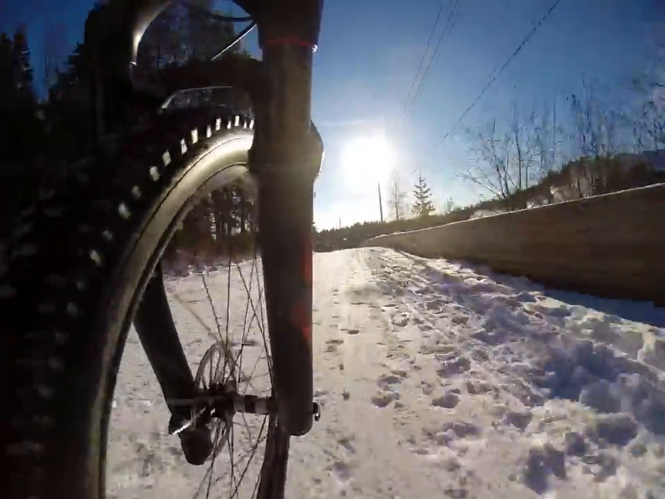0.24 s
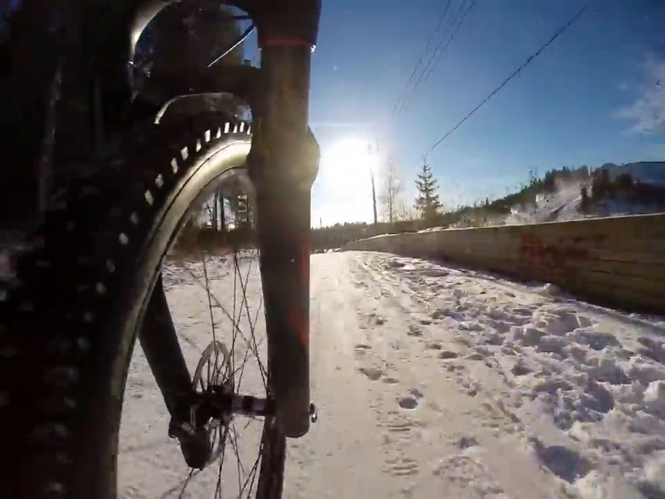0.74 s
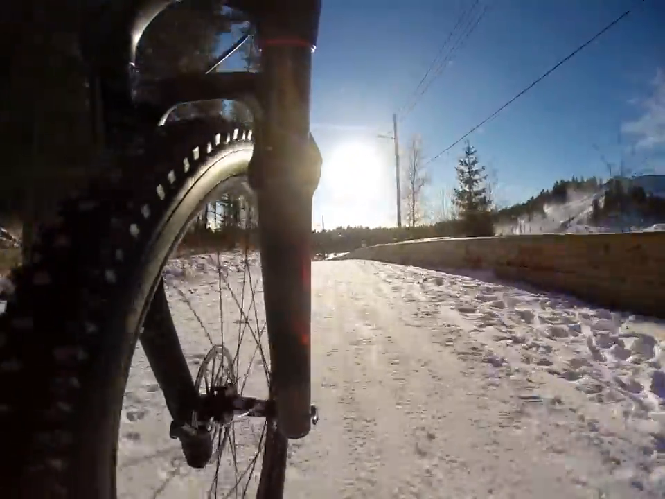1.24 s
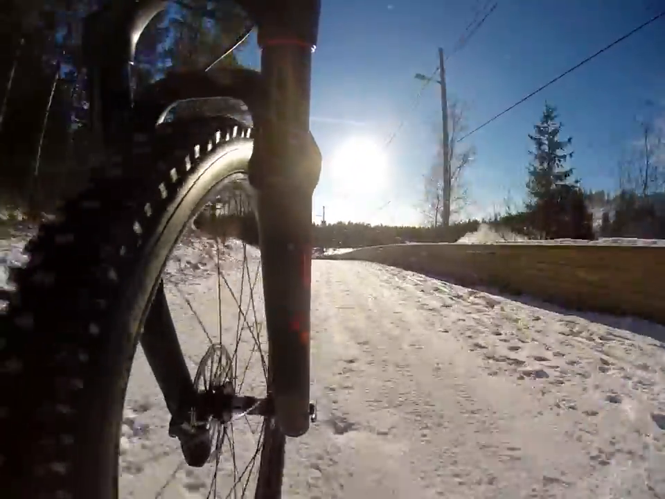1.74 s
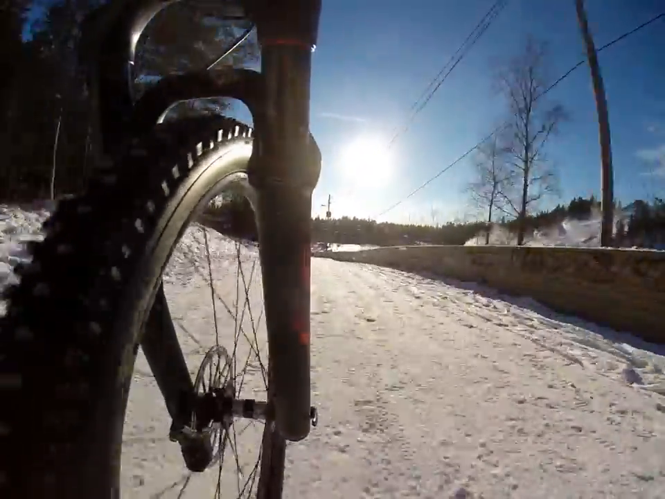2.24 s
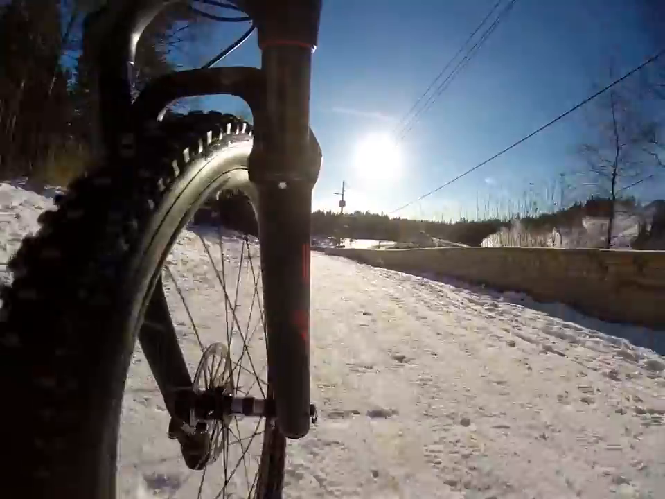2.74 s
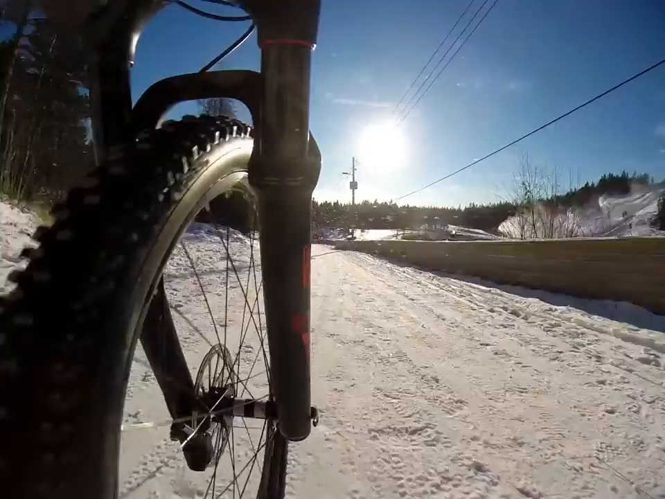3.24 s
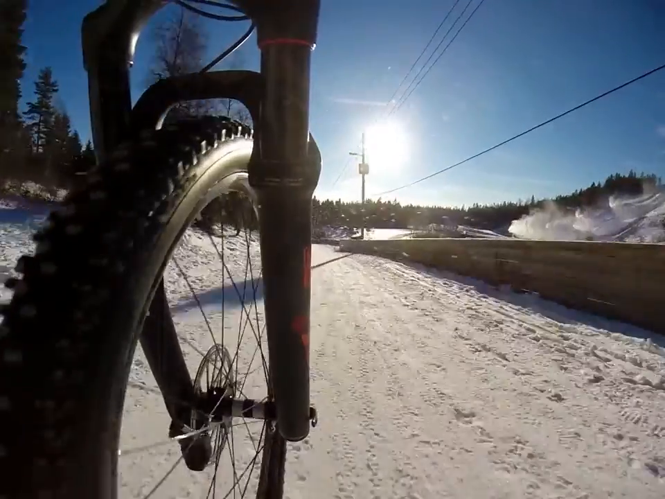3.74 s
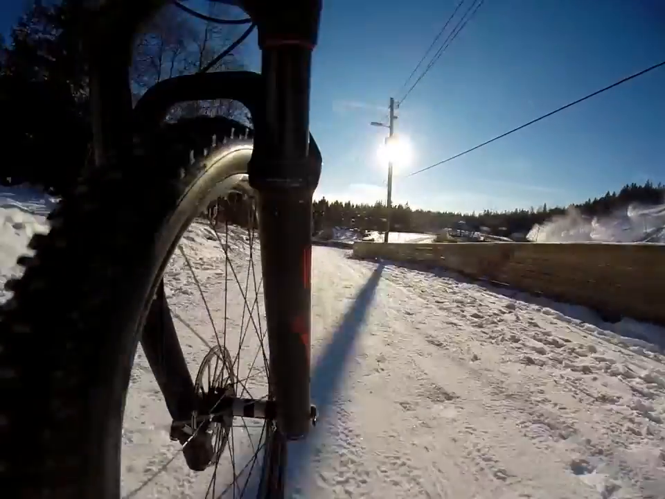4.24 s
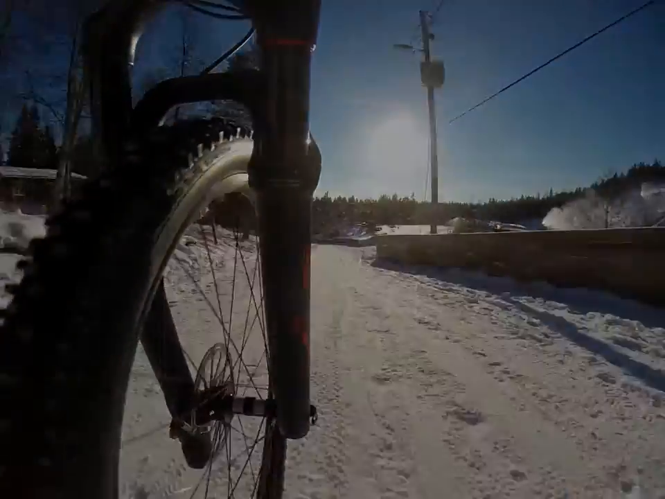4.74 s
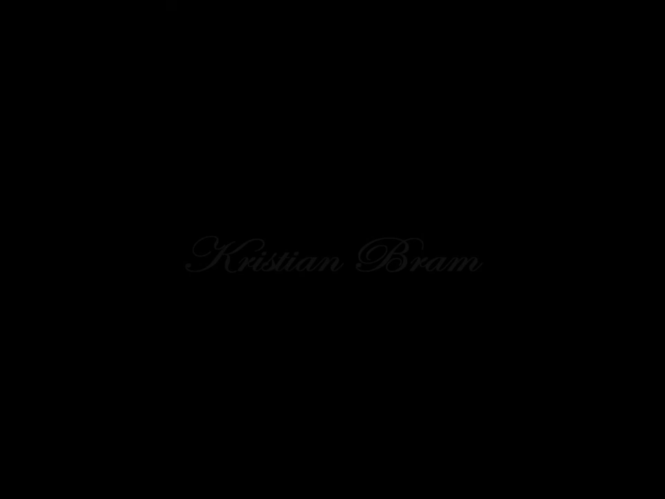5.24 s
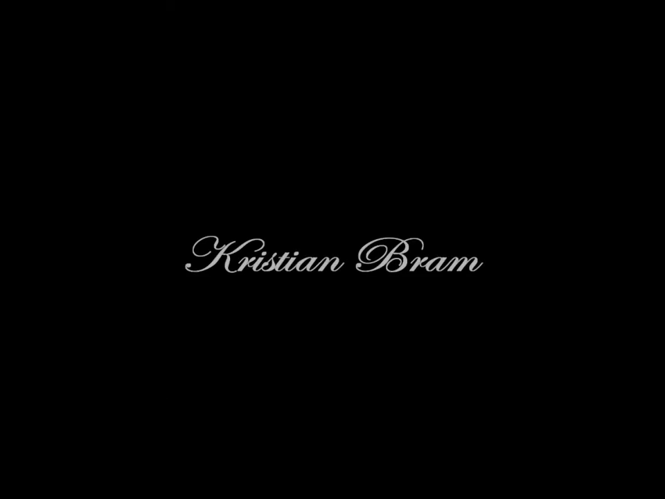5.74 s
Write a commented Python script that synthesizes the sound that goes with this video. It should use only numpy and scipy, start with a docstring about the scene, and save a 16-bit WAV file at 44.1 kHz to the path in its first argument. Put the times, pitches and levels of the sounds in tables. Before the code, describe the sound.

Continuous fast riding on snow, close and dry, slightly boxy as if through a camera case. Low, throbbing vibration from the bike dominates, with dense crackly crunch of studs biting crust and soft fizz of loose crystals. Small hard clicks of ice on bike and case start sparse, then become stronger and more frequent. The ride keeps going while the sound fades away over the last second or so.

```python
"""A bicycle with studded tyres rolls fast over packed snow, heard from a camera clamped close beside the front wheel.
From the start the low rumble of fork and frame swells and sinks, knobs hum on firm snow, studs crunch through crust.
Lumps break, plates snap and powder fizzes; flung ice grains tick on bike and case, louder from about 1.8 s.
From 4.62 s everything fades to silence. Modes are drifting tones and shaped noise; snow and ice are
random taps, short fractures and ringing grains, most of them coloured by the camera case."""
import sys
import numpy as np
from scipy import signal
from scipy.fft import rfft, irfft
from scipy.io import wavfile
from scipy.ndimage import uniform_filter1d

SR = 44100
rng = np.random.default_rng(int(sys.argv[2]) if len(sys.argv) > 2 else 0)


def wav_out(sig):
    """Save sig, one row per channel (or a flat mono array), as 16-bit PCM at SR to the path in sys.argv[1]."""
    wavfile.write(sys.argv[1], SR, np.round(np.clip(np.atleast_2d(sig).T, -1, 1) * 32767).astype(np.int16))


N = 263718
TIME = np.arange(N) / SR  # s
NOISE_HZ = np.fft.rfftfreq(N, 1 / SR)
EDGE_HZ = 15000  # upper limit of the camera's sound

# swells of the low rumble: centre t/s, width at half power/s, fork level/dB and frame level/dB before trim
SWELLS = [(0.004, 0.04, -14.5, -30), (0.09, 0.028, -36, -15), (0.184, 0.086, -18, -38),
          (0.263, 0.078, -10, -26), (0.53, 0.1, -18.5, -20.5), (0.617, 0.062, -15, -34),
          (0.735, 0.1, -34.5, -15), (0.965, 0.063, -15, -15.5), (1.135, 0.098, -17, -19),
          (1.323, 0.065, -17, -20.5), (1.44, 0.04, -14, -15), (1.499, 0.024, -27, -10.5),
          (1.589, 0.057, -17, -16.5), (1.843, 0.061, -13, -27), (1.932, 0.03, -14, -19.5),
          (2.046, 0.022, -13.5, -19), (2.166, 0.11, -14, -25), (2.358, 0.057, -15.5, -19),
          (2.479, 0.031, -14, -21), (2.57, 0.18, -15.5, -19), (2.748, 0.035, -15.5, -13.5),
          (2.913, 0.082, -20, -15), (3.02, 0.043, -23, -12.5), (3.078, 0.045, -13.5, -30),
          (3.184, 0.12, -16.5, -36), (3.46, 0.094, -17.5, -17), (3.645, 0.039, -23, -12),
          (3.701, 0.028, -13.5, -30), (3.863, 0.061, -19, -20), (3.94, 0.037, -15, -28),
          (4.068, 0.03, -37, -12.5), (4.134, 0.063, -18, -15), (4.262, 0.03, -13.5, -28),
          (4.42, 0.11, -22, -20), (4.584, .06, -21.5, -23), (4.79, 0.2, -21, -32), (5.05, 0.22, -30, -21.5),
          (5.378, 0.072, -26, -32), (5.516, 0.039, -18.5, -32)]
# steady drone of the frame under the swells: t/s, level/dB before trim
FRAME_DRONE = [(0, -16.5), (0.4, -21.5), (0.9, -23), (2.2, -21), (3.03, -21), (3.16, -26.5), (3.4, -20),
               (4.6, -18), (4.8, -25), (5.05, -23), (5.9, -23)]


def swells(fork_idle_db=-22, fork_throb_db=4.5, frame_throb_db=3, throb_hz=9.4):
    """Gains of fork and frame: the rumble swells and sinks over a throbbing idle level, powers adding."""
    power = 0
    for s, width_s, *levels_db in SWELLS:
        swell = np.exp(-np.log(16) * ((TIME - s) / width_s) ** 2)
        power = power + np.outer(gain_of(levels_db) ** 2, swell)
    fork_swell, frame_swell = np.sqrt(power)
    fork_idle = gain_of(fork_idle_db + fork_throb_db * np.tanh(wander(throb_hz)))
    frame_idle = follow(FRAME_DRONE) * gain_of(frame_throb_db * np.tanh(wander(throb_hz)))
    return np.hypot(fork_swell, fork_idle), np.hypot(frame_swell, frame_idle)


# loose resonances of fork and frame: f/Hz, half-width at -6 dB/Hz, relative level/dB
FORK = [(28.1, 10, -7.5), (39.8, 20, -7), (52.3, 14, -7)]
FRAME = [(99.4, 37, -10), (127.3, 16.3, -7.5), (154, 25, -21)]
# spectrum of the ground rumble: f/Hz, relative level/dB
RUMBLE_COLOUR = [(13, -18), (23, -7.5), (50, 5.5), (72, -3), (100, 7.5), (150, -7), (180, -5), (220, -1),
                 (255, -15), (350, -6), (550, -11), (1000, -64)]


def bike(shake, drone, fork_hz=50.42, frame_hz=113.83, fork_loose_db=-3.0, fork_top_hz=63):
    """The fork swings low, the frame drones just over an octave above, and the ground rumbles through both."""
    fork_tone = sway(fork_hz, drift_hz=2.66, rate_hz=4.1)
    fork_noise = gain_of(fork_loose_db) * shaken(FORK, steadiness=0.73, memory_s=0.018)
    fork = shake * evened(fork_tone + fork_noise)
    fork = signal.sosfiltfilt(signal.butter(6, fork_top_hz, fs=SR, output="sos"), fork, padtype=None)
    frame_tone = sway(frame_hz, drift_hz=2.77, rate_hz=5.15)
    frame = drone * evened(frame_tone + shaken(FRAME, steadiness=0.56, memory_s=0.056))
    ground = (shake * drone) ** 0.25 * evened(shaped_noise(gain_of(read(RUMBLE_COLOUR, NOISE_HZ))))
    return gain_of(0.96) * fork + gain_of(-2.0) * frame + gain_of(-21.0) * ground


# firm snow under the knobs: start t/s, length/s, knob hum level/dB before trim, casing ring level/dB
GRIPS = [(0.544, 0.053, -34, -33), (0.688, 0.11, -47, -32.5), (0.838, 0.14, -27.5, -33.5),
         (1.154, 0.16, -32.5, -35.5), (1.261, 0.053, -32, -28), (1.383, 0.065, -44, -29),
         (1.647, 0.19, -30.5, -36.5), (2.425, .16, -35, -31), (2.715, 0.25, -50, -36),
         (2.976, 0.087, -25, -29), (3.378, 0.3, -32, -29.5), (3.797, 0.16, -33, -32),
         (3.99, 0.14, -26.5, -35), (4.221, 0.045, -25, -45), (4.6, 0.28, -27.5, -37),
         (4.675, 0.071, -24.5, -42), (4.958, 0.18, -38, -35.5)]


def grips(crust_db, idle_db=-38.5, edge_s=0.013, hum_per_crust=0.4):
    """Gains of knob hum and casing ring: firm stretches stand out from an idle level that rises on crust."""
    grip = sum(np.outer(gain_of(dbs), stretch(s, length_s, edge_s)) for s, length_s, *dbs in GRIPS)
    return np.hypot(grip, gain_of(idle_db + hum_per_crust * crust_db))


# resonances of the tyre casing: f/Hz, half-width at -6 dB/Hz, relative level/dB
TREAD = [(398, 40, -1), (426.5, 38, 3.5), (466, 5.6, 5.5), (464.6, 21, 3)]


def tread(hum, ring, knob_hz=398.5, sway_hz=11.0, waver_db=0.5):
    """Rows of knobs slap the snow at a nearly steady rate; rough snow sets the tyre casing ringing."""
    slaps = np.cumsum(knob_hz + sway_hz * wander(rate_hz=35.0)) / SR
    tone = evened(np.sin(2 * np.pi * slaps))
    level = hum * gain_of(-4.0 + waver_db * wander(rate_hz=6.8))
    return level * tone + ring * shaken(TREAD, steadiness=0.27, memory_s=0.18)


# patches of hard crust: start t/s, length/s, change of crunch level/dB, change of powder fizz level/dB
CRUST = [(0.0, 0.17, 2, 2.5), (0.177, 0.1, 4.5, 4.5), (0.395, 0.05, 1, 2), (0.47, 0.32, 3.5, 3.5),
         (0.884, 0.09, 3.5, 4), (1.225, 0.12, 5.5, 6.5), (1.362, 0.13, 4.5, 4.5), (1.669, 0.15, 8, 4.5),
         (2.024, 0.16, 3.5, 3), (2.252, 0.1, 6, -6), (2.382, 0.21, 6, 7), (2.647, 0.14, 3, 4),
         (2.813, 0.11, 2.5, 3), (2.974, 0.1, 6, 2), (3.298, 0.044, 8, 6), (3.39, 0.31, 6, 4.5),
         (3.783, 0.18, 3.5, 3.5), (3.99, 0.14, 7, 6), (4.153, 0.12, 6, 3), (4.324, 0.1, 4, 4),
         (4.548, 0.26, 4, 4), (4.95, 0.48, 3, 4), (5.607, 0.44, 2, 5.5)]


def crust(soft_snow_db=-36.5, edge_s=0.024, uneven_db=1.3):
    """Crunch gain, with the crust and fizz changes in dB, as the tyre runs through patches of hard crust."""
    crust_db, fizz_db = sum(np.outer(dbs, stretch(s, length_s, edge_s)) for s, length_s, *dbs in CRUST)
    crunch = gain_of(soft_snow_db + crust_db + uneven_db * wander(rate_hz=13))
    return crunch, crust_db, fizz_db


# spectrum of the stud bites: f/Hz, relative level/dB
CRUNCH_COLOUR = [(100, -2), (300, 7.5), (550, -5), (800, -2), (950, -2), (1700, -0.5), (2300, -12.5),
                 (2700, -13.5), (3600, -19.5), (4400, -38), (6200, -35.5), (8000, -51.5), (15000, -77.5)]


def studs(crunch, clumps):
    """Studs bite the crust in quick clumps, each bite a short tap through the case, stronger inside a clump."""
    bites = patter(per_s=2200, spread_db=0.0) * gain_of(1.28 * clumps)
    sound = signal.oaconvolve(bites, case_ring(CRUNCH_COLOUR))[:N]
    sound /= band(sound, 550, 1600).std()  # the level counts in this band
    return gain_of(-4.0) * crunch * sound


def crackle(crunch, plates_db=-7.0, chips_db=-22.5):
    """Small plates of crust snap one by one, and finer chips break off their edges."""
    plates = snaps(lo_hz=770, hi_hz=2448, per_s=330, cycles=4.3, spread_db=2.5)
    chips = snaps(lo_hz=2080, hi_hz=6770, per_s=170, cycles=2.6, spread_db=3.0)
    plates = gain_of(plates_db) * evened(band(plates, 460, 1700))
    chips = gain_of(chips_db) * evened(band(chips, 1500, 3270))
    return crunch * (plates + chips)


# lumps of crust that break under the tyre: t/s, length/s, level/dB before trim, pitch f/Hz
LUMPS = [(0.015, 0.0039, -24.5, 990), (0.138, 0.0065, -25.5, 1150), (0.199, 0.011, -29, 1390),
         (0.394, 0.0032, -25.5, 1610), (0.41, 0.0031, -27, 895), (0.433, 0.0068, -25, 1290),
         (0.495, 0.0025, -32, 1750), (0.537, 0.014, -27.5, 1060), (0.596, 0.011, -28, 1810),
         (0.614, 0.008, -28, 1530), (0.639, 0.0077, -27, 1760), (0.673, 0.0051, -24, 1340),
         (0.726, 0.0042, -22.5, 1490), (0.758, 0.012, -30, 1210), (0.903, 0.013, -30, 880),
         (0.923, 0.004, -29.5, 1800), (1.051, 0.0093, -27.5, 1030), (1.106, 0.018, -32, 1420),
         (1.392, 0.0053, -20.5, 1500), (1.406, 0.019, -27.5, 1050), (1.43, 0.0087, -21.5, 1780),
         (1.482, 0.0088, -26.5, 1580), (1.566, 0.0039, -29.5, 1210), (1.578, 0.011, -30, 1530),
         (1.655, 0.0032, -19, 1200), (1.714, 0.0034, -28, 1560), (2.025, 0.0031, -23.5, 1780),
         (2.138, 0.013, -27.5, 910), (2.158, 0.008, -31, 1500), (2.252, 0.0058, -35, 1950),
         (2.428, 0.013, -24, 940), (2.445, 0.0079, -20, 1630), (2.537, 0.0078, -21, 1250),
         (2.563, 0.0044, -28, 1330), (2.584, 0.0026, -25.5, 2050), (2.648, 0.005, -29, 1300),
         (2.663, 0.0027, -24.5, 1660), (2.74, 0.0066, -23, 850), (2.76, 0.005, -23, 1570),
         (2.822, 0.011, -31, 1840), (2.952, 0.011, -29.5, 1300), (3.018, 0.0084, -21, 1100),
         (3.177, 0.0066, -31.5, 1570), (3.327, 0.003, -25.5, 1310), (3.431, 0.009, -28.5, 1260),
         (3.493, 0.0047, -23.5, 900), (3.606, 0.016, -28.5, 1370), (3.629, 0.005, -28, 1850),
         (3.803, 0.013, -27.5, 1130), (3.87, 0.0067, -27, 1210), (4.016, 0.009, -32, 1960),
         (4.058, 0.008, -29, 1700), (4.399, 0.009, -31, 1790), (4.597, 0.0074, -42, 1970),
         (4.853, 0.0065, -22.5, 970), (5.241, 0.0062, -25.5, 1640)]
# spectrum of a breaking lump: f/Hz, relative level/dB
LUMP_COLOUR = [(300, 5), (550, -3), (900, -2), (2000, 0), (2700, -12), (3600, -12.5), (4400, -39.5),
               (6200, -37), (15000, -72.5)]


def lumps(level_db=-1.5, focus_db=11, focus_hz=400, crumble_s=0.0012, delay_s=0.000796):
    """Each lump gives way in a short run of fractures that ring about its own pitch."""
    out, t = np.zeros(N), TIME[:1024]
    ring = case_ring(LUMP_COLOUR)
    hz = np.fft.rfftfreq(len(ring), 1 / SR)
    delayed = rfft(ring) * np.exp(-2j * np.pi * hz * delay_s)
    chances = rng.standard_normal((len(LUMPS), len(t)))
    for (s, length_s, db, pitch_hz), chance in zip(LUMPS, chances):
        focus = gain_of(focus_db / (1 + ((hz - pitch_hz) / focus_hz) ** 2))
        run = np.exp(-np.maximum(t - 0.62 * length_s, 0) / crumble_s)
        burst = signal.fftconvolve(chance * abs(chance) * run, irfft(delayed * focus))
        # the level is the mean over the lump's length, in its main band
        burst *= np.sqrt(abs(length_s) * SR) / np.linalg.norm(band(burst, 690, 2400))
        add(out, s, gain_of(db + level_db) * burst)
    return out


# ice grains that strike the bike: t/s, level over 3 ms/dB, weight of the dull part/dB before dull_db, hardness/dB
TICKS = [(0.2562, -31, 17, 0), (0.3637, -28.5, -2, 3.5), (0.5, -29.5, -10, 0), (0.6716, -31, 2, -5),
         (0.783, -27, 2, -2), (0.8623, -29.5, 4, -4), (0.9659, -28.5, 13, -5), (1.0305, -26, 1, 3),
         (1.041, -27, 6, -12), (1.059, -37, -6, -2), (1.072, -30.5, 4, 4), (1.3562, -35, -10, 9),
         (1.5556, -31, -3, -4), (1.57, -31.5, 1, 3), (1.6841, -24, -3, -15), (1.778, -31, -2, 12),
         (1.7945, -18, 5, 1), (1.826, -28.0, -7, -7), (2.1145, -22.5, 5, -1), (2.3133, -24.5, 3, -4),
         (2.338, -31, 2, 6), (2.4048, -32, -8, 15), (2.4663, -19.5, 13, -6), (2.4839, -26.5, 7, 2),
         (2.532, -22, 2, 2), (2.701, -32, -8, 0), (2.714, -32, -8, 6), (2.7335, -32, -4, 9),
         (2.8628, -14, 10, 2), (2.977, -18, -10, -7.5), (2.994, -20, -16, -3), (3.0484, -15.5, 12, 1),
         (3.1497, -21.5, 5, -3), (3.3027, -19.5, -15, -0.5), (3.3829, -20, 9, 1), (3.5022, -19.5, -1, 1),
         (3.5487, -35, 0, -1), (3.578, -18.0, 1, -2), (3.6361, -22.5, 15, 3), (3.659, -20.5, -8, -2),
         (3.761, -27, -9, -3), (3.83, -24, 5, -5), (3.925, -21.5, 16, 3), (3.951, -38, -3, 12),
         (4.1364, -18.5, 8.5, 1.5), (4.1673, -38, -7, 12), (4.2192, -25.5, 5, -2), (4.25, -22, -4, -5),
         (4.316, -25, 6, 0), (4.343, -23, -14, 0), (4.38, -29, 0, -14), (4.4088, -32.5, -5, -6),
         (4.439, -23, -3, -2.5), (4.5025, -21.0, 11, 4), (4.6008, -29, -7, -7), (4.7041, -23, 15, -4),
         (4.7535, -17, 3.5, -1.5), (4.776, -31, -2, -10), (4.8202, -32, -10, 0), (4.8491, -27.5, -2, -7),
         (4.8765, -26, 13, 3), (4.9, -24, 7, -1), (5.013, -32, 8, -11), (5.086, -27.5, -7, -5),
         (5.156, -21.5, 14, 5), (5.232, -27, -2, -5), (5.2835, -22.5, 7, 0.5), (5.379, -23, 15, -1.5),
         (5.5154, -21.5, 13, 2), (5.634, -31.5, -8, -12), (5.715, -27.5, -4, -10), (5.776, -36, -1, -2),
         (5.884, -31, -3, -1)]
# spectrum of a middling grain's tap: f/Hz, relative level/dB
TICK_COLOUR = [(100, -39), (500, -26), (800, -42.5), (1100, -11.5), (1500, -13.5), (1800, 1.5), (2300, 0.5),
               (2550, -5), (3600, -8.5), (4400, -25.5), (6500, -22.5), (8000, -35.5), (11000, -44),
               (15000, -53.5)]


def ticks(grains, rebound_s=0.00083, rebound=0.3, dull_db=3, spot_db=2.0, size_spread=0.074,
          ringing=0.99, ring_spread=0.35, shatter_db=-6, shatter_s=0.0022, splinter_hz=3500,
          crumbs_db=-12, crumbs_s=0.004, delay_s=0.000997):
    """A hard grain taps the bike, rebounds in about a millisecond and shatters; size and spot set its colour."""
    out, t = np.zeros(N), TIME[:1024]
    spots_hz = np.geomspace(600, 14000, num=20)
    hz = np.fft.rfftfreq(2 * len(t), 1 / SR)
    chances = rng.standard_normal((len(grains), 3 + len(spots_hz)))
    shards = rng.standard_normal((len(grains), len(t))) * np.exp(-t / shatter_s)
    crumbs = rng.standard_normal((len(grains), len(t))) ** 3 * np.exp(-t / crumbs_s)
    for (s, db, weight_db, hard_db), chance, bits, scatter in zip(grains, chances, shards, crumbs):
        late, size, near, *spot = chance
        stretched = 1 + size_spread * np.tanh(size)
        colour = [(f * stretched, level) for f, level in TICK_COLOUR]
        ring = case_ring(colour, ringing + ring_spread * np.tanh(near))
        # heavy grains carry more below the ring of the case, hard ones more above it
        dull = (weight_db + dull_db) / (1 + (hz / 1650) ** 8)
        hard = hard_db * hz ** 8 / (hz ** 8 + 2550. ** 8)
        gain = gain_of(dull + hard + spot_db * np.interp(hz, spots_hz, spot))
        tap = irfft(rfft(ring) * gain * np.exp(-2j * np.pi * hz * delay_s))
        # shards and first blow, then crumbs, then the rebound a little earlier or later
        blows = gain_of(shatter_db) * band(bits / np.linalg.norm(bits), splinter_hz, EDGE_HZ)
        add(blows, 0, [1])
        add(blows, rebound_s, gain_of(crumbs_db) * scatter / np.linalg.norm(scatter))
        add(blows, rebound_s * (1 + 0.51 * np.tanh(late)), [rebound])
        tick = signal.fftconvolve(blows, tap)
        tick *= np.sqrt(0.003 * SR) / np.linalg.norm(band(tick, 1500, 9000))
        add(out, s, gain_of(db) * tick)
    return out


def stray_grains(level_db=-38, count=14):
    """Smaller ice grains hit at random all along the way; rows as in TICKS."""
    spreads_db = rng.standard_normal((count, 3)) * [2, 4, 3]  # level, weight, hardness
    times = (np.arange(count) + rng.random(count)) * TIME[-1] / count
    return [(s, level_db + force_db, *colour_db) for s, (force_db, *colour_db) in zip(times, spreads_db)]


# spectrum of loose snow: f/Hz, relative level/dB
POWDER_COLOUR = [(300, 0), (900, 11), (2200, -5), (2700, 0), (3600, -2), (4400, -18.5), (6200, -14.5),
                 (7800, -28.5), (10300, -29), (11500, -42.5), (15000, -55.5)]


def powder(fizz_db, clumps, level_db=-50.0):
    """Fine snow crystals fizz under the tread, mostly more where they lie loose on crust."""
    grains = snaps(lo_hz=1830, hi_hz=14700, per_s=3500, cycles=1.68, spread_db=-2)
    grains = grains * gain_of(2.5 * clumps + 3.4 * wander(rate_hz=25))
    sound = signal.oaconvolve(grains, case_ring(POWDER_COLOUR, ringing=0.75))[:N]
    return gain_of(level_db + fizz_db) * evened(sound)


# spectrum of flung crystals on the case: f/Hz, relative level/dB
SPRAY_COLOUR = [(500, -22), (2200, -2.5), (3600, 3.5), (4500, -4.5), (6500, -8), (8000, -14), (10300, -20),
                (12000, -21.5), (14000, -34.5), (15500, -52.5)]


def spray(crunch, clumps):
    """Stray crystals flung off the tread prick the case, sparse and bright."""
    pricks = patter(per_s=90, spread_db=-0.5) * gain_of(5.4 * np.tanh(clumps))
    return gain_of(-33) * crunch * evened(signal.oaconvolve(pricks, case_ring(SPRAY_COLOUR))[:N])


# splinters of ice that prick the case: t/s, level over 2 ms/dB before trim
SPLINTERS = [(0.223, -42), (0.9147, -50), (0.9366, -44), (0.96, -44), (1.295, -48.5), (1.7848, -49),
             (1.818, -46), (2.301, -48), (2.352, -39), (2.715, -51), (2.946, -41), (3.027, -39),
             (3.484, -50), (3.5912, -37), (3.651, -47), (4.0273, -44), (4.6837, -41)]


def splinters(level_db=-0.5, bright_db=3):
    """Now and then a larger splinter flies off the tread and makes one thin, bright prick."""
    out = np.zeros(N)
    colour = [(f, db + bright_db * np.tanh((f - 8000) / 3000)) for f, db in SPRAY_COLOUR]
    prick = case_ring(colour)
    prick *= np.sqrt(0.002 * SR) / np.linalg.norm(prick)
    for s, db in SPLINTERS:
        add(out, s, gain_of(db + level_db) * prick)
    return out


# resonances of the camera case: f/Hz, full width at half the lift/Hz, lift level/dB before ringing scales it
CASE = [(627.7, 46, 11.5), (734.4, 99, 10.5), (860, 110, 6), (934, 39, -14.5), (1210, 38, 7),
        (1338, 18, -4), (1437, 43, 6.5), (2261, 190, 8.5), (2900, 53, -3.5), (3914, 44, -18), (4040, 59, 3),
        (5470, 110, 9.5), (6800, 150, -3), (7160, 240, 5)]


def case_ring(colour, ringing=1, size=4096):
    """Causal (minimum-phase) response of the camera case to one tap, peak about 1; ringing scales its lifts."""
    hz = abs(np.fft.fftfreq(size, 1 / SR))
    lifts_db = sum(lift / (1 + (2 * (hz - f) / width) ** 2) for f, width, lift in CASE)
    log_gain = np.log(gain_of(read(colour, hz) + ringing * lifts_db))
    ring = np.fft.ifft(np.exp(np.conj(signal.hilbert(log_gain)))).real[:size // 2]
    return ring * np.hanning(size)[size // 2:] / abs(ring).max()


def sway(hz, drift_hz, rate_hz):
    """A lightly damped mode that keeps swinging: a tone whose pitch drifts."""
    return evened(np.sin(2 * np.pi * np.cumsum(hz + drift_hz * wander(rate_hz)) / SR))


def shaken(modes, steadiness, memory_s):
    """Modes driven by random shaking; steadiness 0-1 evens out the swing."""
    power = sum(gain_of(db) ** 2 / (1 + ((NOISE_HZ - f) / width) ** 2) ** 2 for f, width, db in modes)
    swing = shaped_noise(np.sqrt(power))
    energy = abs(uniform_filter1d(abs(signal.hilbert(swing)) ** 2, int(memory_s * SR) + 1))
    return evened(swing / (energy + 1e-20) ** (np.clip(steadiness, 0, 1) / 2))


def snaps(lo_hz, hi_hz, per_s, cycles, spread_db, count=36):
    """Grains that each ring for a few cycles at a pitch set by their size."""
    out, t = np.zeros(N), TIME[:1024]
    for hz in np.geomspace(lo_hz, hi_hz, count):
        age = t * hz / cycles
        snap = hz * age * np.exp(-2 * age) * np.sin(2 * np.pi * hz * t)
        out += signal.oaconvolve(patter(per_s / count, spread_db), snap)[:N]
    return evened(out)


def patter(per_s, spread_db):
    """A random train of taps of either sign; a positive spread makes a few large, a negative one a few small."""
    size = gain_of(spread_db * np.minimum(rng.exponential(1, N), 4))
    return size * rng.choice([-1, 1], N) * (rng.random(N) < per_s / SR)


def stretch(start_s, length_s, edge_s):
    """The tyre rolls onto a stretch of snow and off again: rise, hold, release, from 0 to 1."""
    return np.clip(.5 + np.minimum(TIME - start_s, start_s + length_s - TIME) / edge_s, 0, 1)


def wander(rate_hz):
    """Smooth random curve of rms 1, from 2 Hz to about the given rate."""
    return evened(shaped_noise(np.exp(-(NOISE_HZ / rate_hz) ** 2) * (NOISE_HZ > 2)))


def shaped_noise(amplitude):
    """White noise shaped by an amplitude for each frequency in NOISE_HZ."""
    return irfft(rfft(rng.standard_normal(N)) * amplitude, N)


def band(x, lo_hz, hi_hz):
    """Band-pass filter."""
    return signal.sosfilt(signal.butter(2, [lo_hz, min(hi_hz, SR / 2 - 1)], "band", fs=SR, output="sos"), x)


def gain_of(db):
    """Amplitude gain of a level in dB."""
    return 10 ** (np.asarray(db) / 20)


def evened(x):
    """Scale to rms 1."""
    return x / np.sqrt(np.mean(x ** 2) + 1e-20)


def read(points, hz):
    """Read a spectrum at given frequencies, along a log frequency axis."""
    f, value = np.transpose(points)
    return np.interp(np.log(hz + 1), np.log(f + 1), value)


def follow(curve):
    """A level curve as a gain for every sample."""
    return gain_of(np.interp(TIME, *np.transpose(curve)))


def add(mix, s, sound):
    """Add a sound into the mix from time s, cut off at the end."""
    part = mix[max(round(s * SR), 0):][:len(sound)]
    part += sound[:len(part)]


def scene():
    """The low rumble swells and sinks, crust raises the crunch, and firm snow brings out the hum."""
    shake, drone = swells()
    crunch, crust_db, fizz_db = crust()
    hum, ring = grips(crust_db)
    clumps = wander(rate_hz=120)  # uneven crust: studs, powder and spray swell together
    snow = studs(crunch, clumps) + crackle(crunch) + lumps()
    loose = powder(fizz_db, clumps) + spray(crunch, clumps) + splinters()
    ice = ticks(list(TICKS) + stray_grains())
    return (bike(shake, drone) + tread(hum, ring) + snow + ice + loose)[None]


def record(dry, fade_start_s=4.62, fade_power=0.82):
    """A rounded fade to silence at the end, then the band limit of the camera."""
    left = np.clip((TIME[-1] - TIME) / (TIME[-1] - fade_start_s), 0, 1)
    fade = np.sin(np.pi / 2 * left) ** fade_power
    lowpass = signal.firwin(255, EDGE_HZ, window=("kaiser", 9), fs=SR)
    return signal.oaconvolve(dry * fade, lowpass[None], "same")


dry = scene()
out = record(dry)
wav_out(out)
```